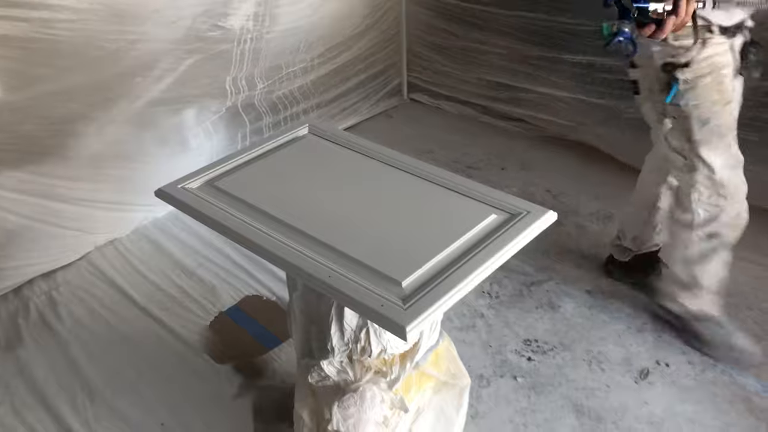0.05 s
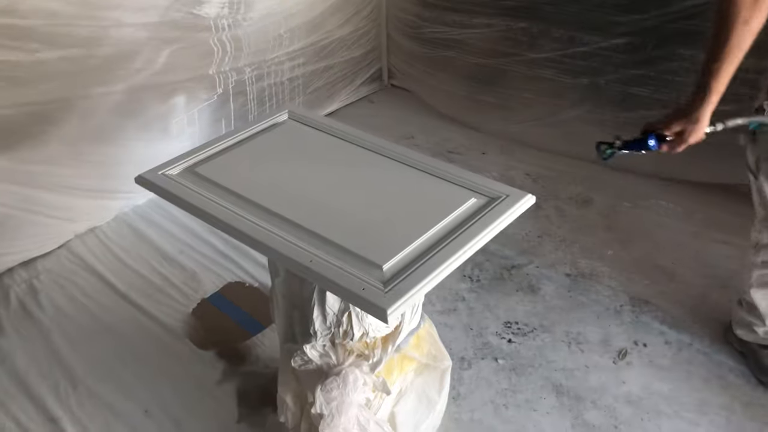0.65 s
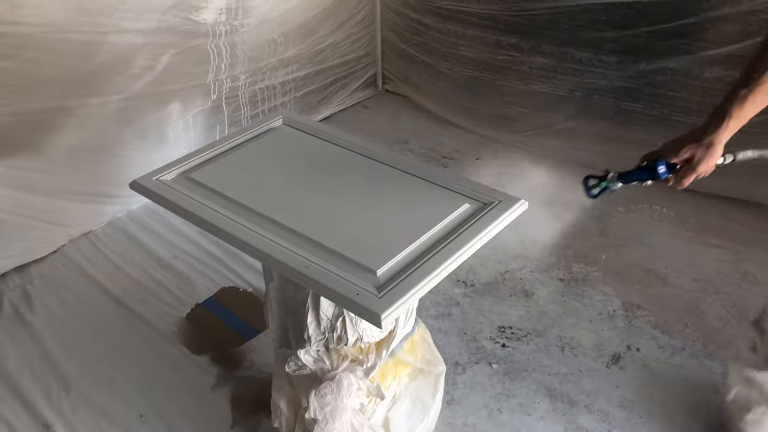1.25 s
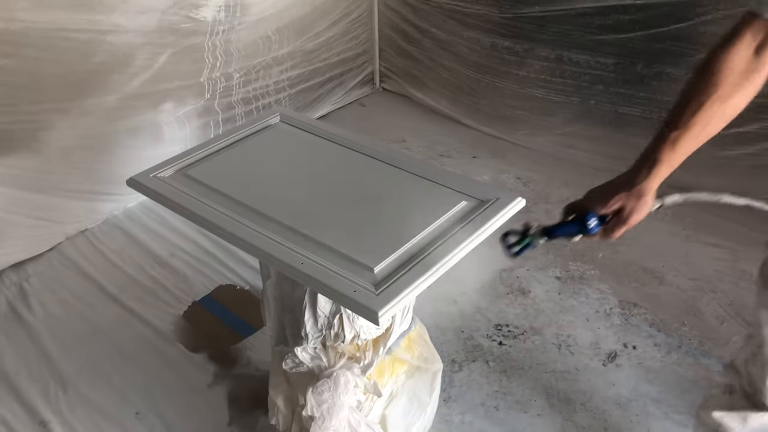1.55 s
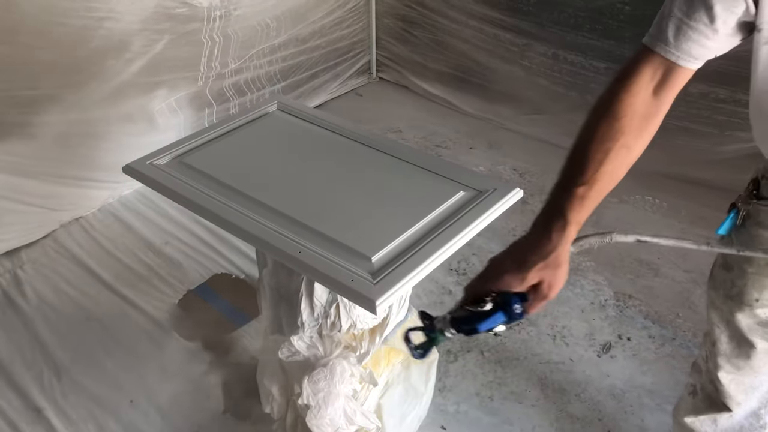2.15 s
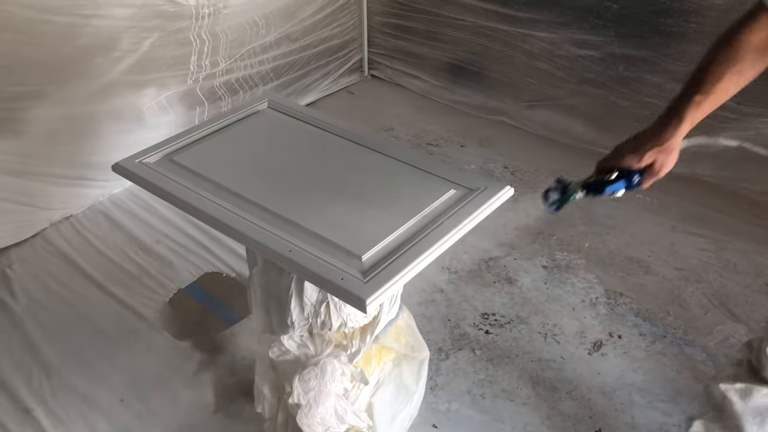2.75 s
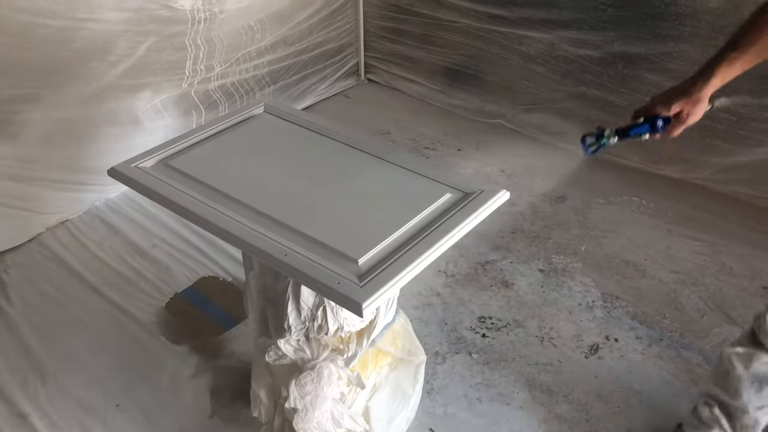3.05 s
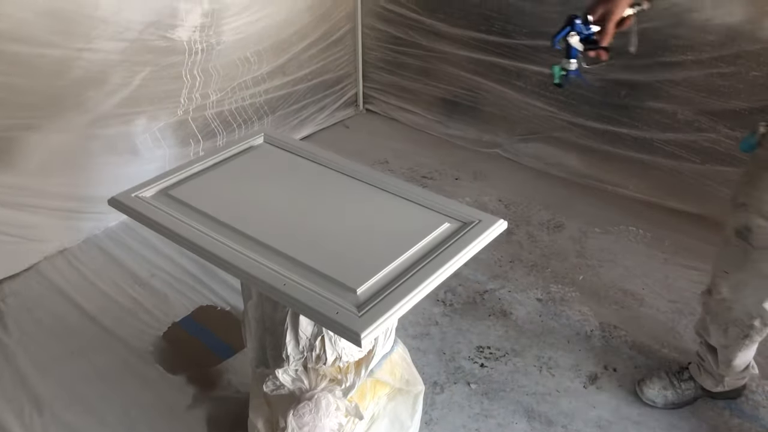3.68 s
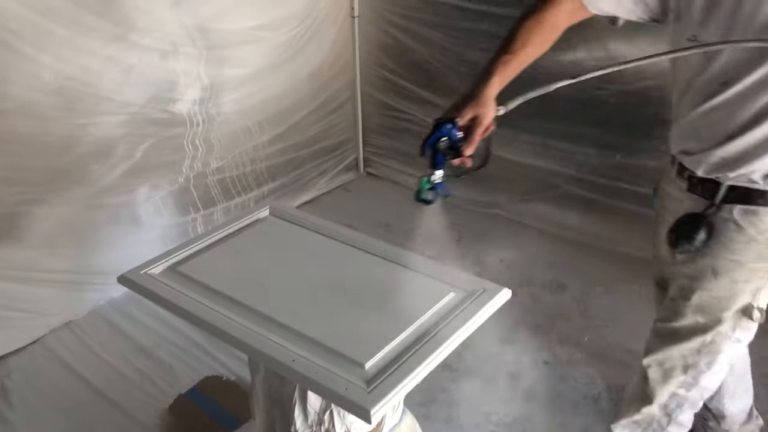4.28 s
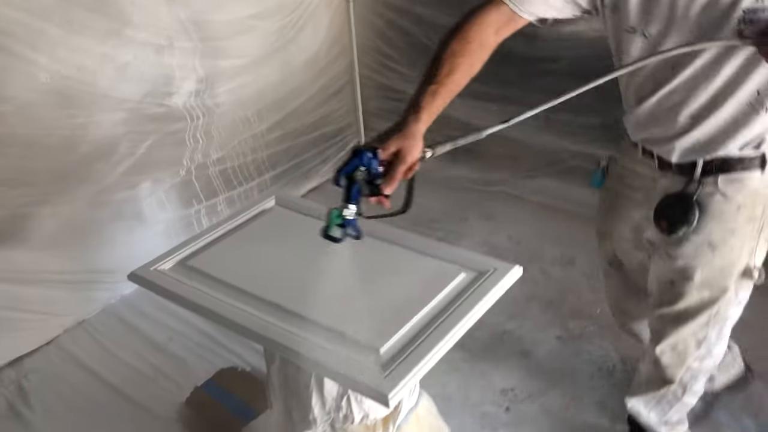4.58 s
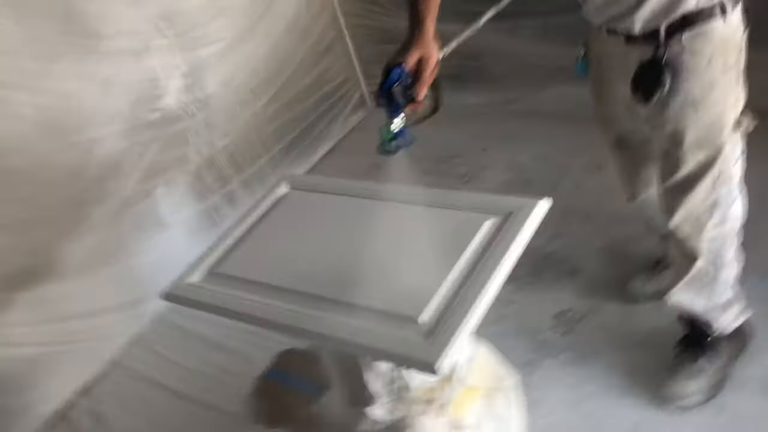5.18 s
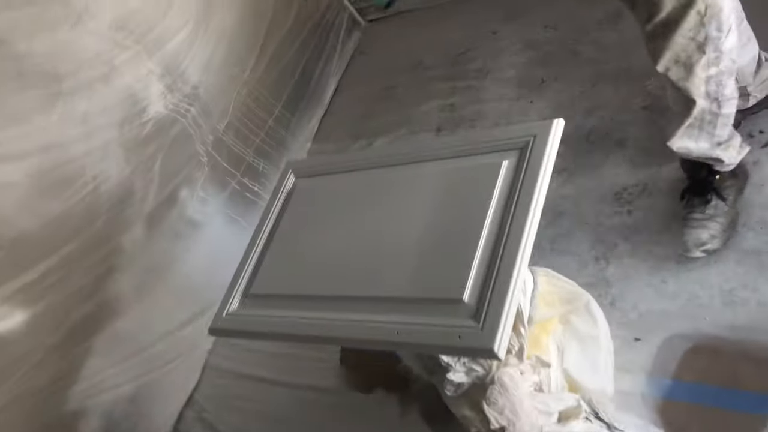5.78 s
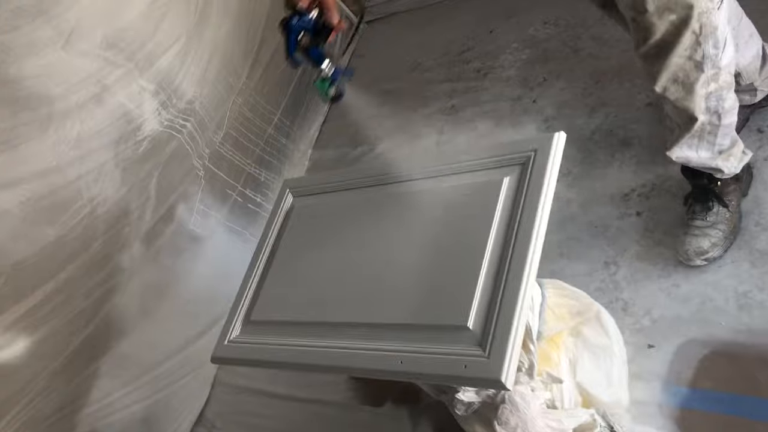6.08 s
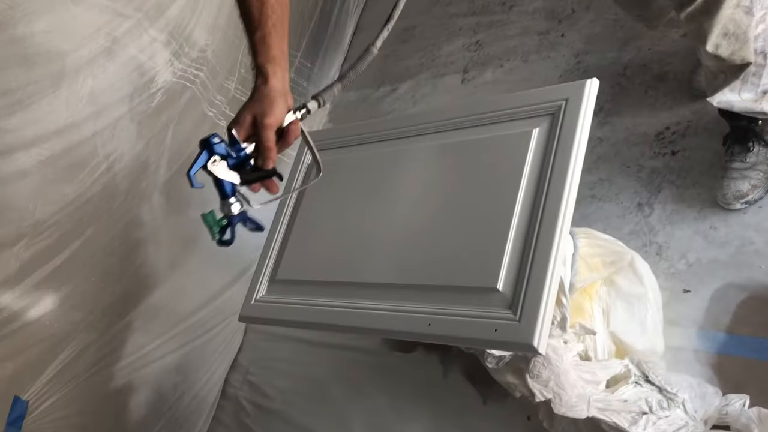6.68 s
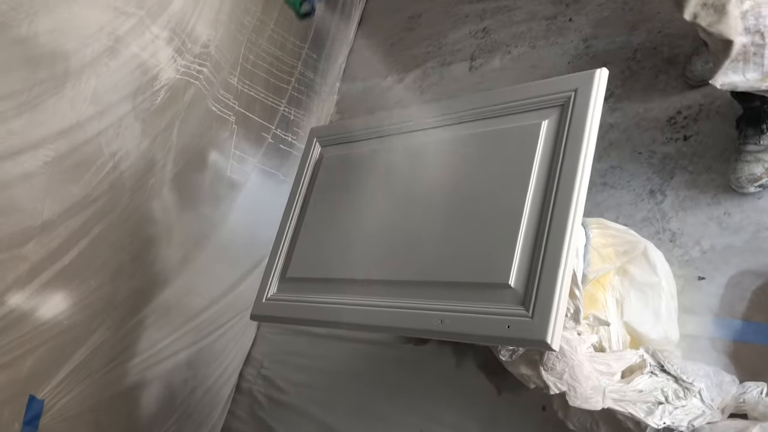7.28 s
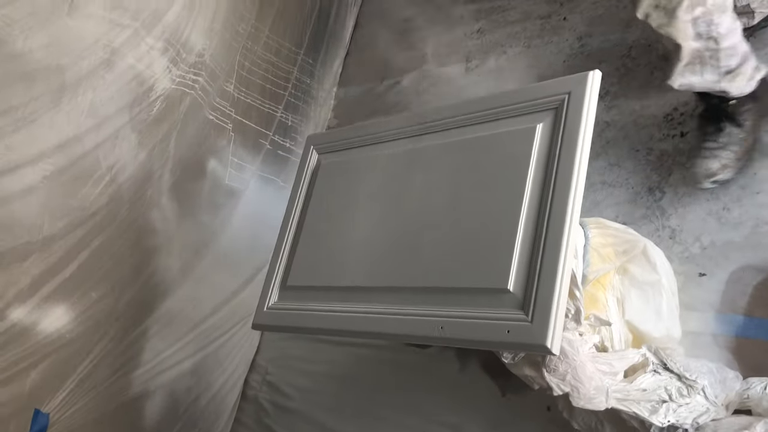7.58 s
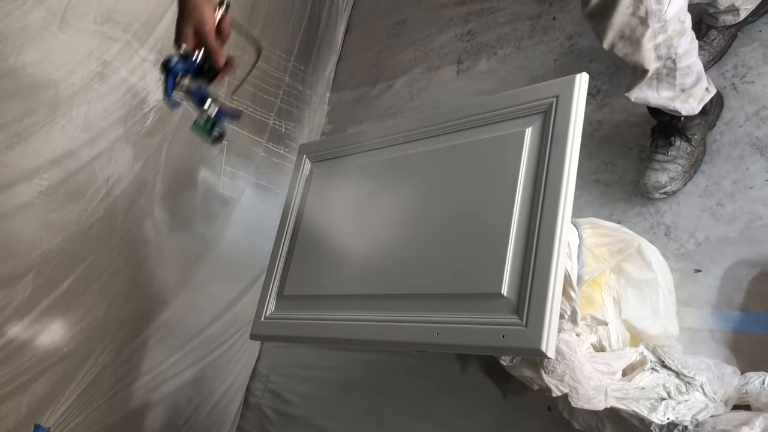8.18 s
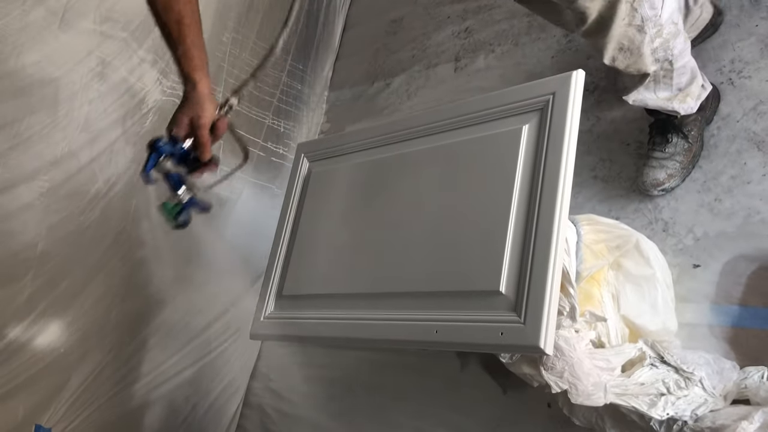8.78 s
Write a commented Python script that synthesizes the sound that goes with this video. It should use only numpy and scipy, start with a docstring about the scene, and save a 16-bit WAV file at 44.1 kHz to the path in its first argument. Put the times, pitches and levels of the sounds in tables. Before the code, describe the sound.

A ventilation fan rumbles faintly throughout in a small plastic-lined booth. During the first second and a half, overalls rustle softly and shoes scuff on a gritty floor. At about 1.1 seconds a paint spray gun snaps on with a bright, airy hiss, the loudest sound, lasting until 2. More passes follow at roughly 2.4 to 3.2, 4 to 4.8, 5 to 5.7, 5.9 to 6.7, 6.9 to 7.6 and 7.9 to 8.6, with a last short burst at 8.8. Each starts sharply and cuts off quickly; the hiss flares and changes colour, swishing more in the second half. From about 1.7 seconds a quieter electric pump, farther off, repeatedly whirrs up and runs down in short spurts, with a geared hum, a light rattle and a thin high whine. Another faint scuff comes near 4.2. The sound is close, with short reflections.

```python
"""Spray-painting a cabinet door

A painter steps up in a plastic-lined booth and sprays in passes with an airless gun. Paint tearing
into mist hisses brightly, changing colour as the gun turns. An electric pump whirrs up and runs down
in short bursts to restore the hose pressure; a ventilation fan rumbles throughout."""
import sys
import numpy as np
from scipy import signal
from scipy.fft import rfft, irfft
from scipy.io import wavfile
from scipy.ndimage import uniform_filter1d, map_coordinates

SR = 44100
rng = np.random.default_rng(int(sys.argv[2]) if len(sys.argv) > 2 else 0)


def put_to_file(sound):
    """Save the sound as 16-bit audio at rate SR, in the file named by the first command-line argument."""
    columns = np.atleast_2d(sound).T  # one column per channel
    safe = np.clip(columns, -1, 1)
    whole_steps = np.round(safe * 32767)
    wavfile.write(sys.argv[1], SR, whole_steps.astype(np.int16))


N = 389844
TIME = np.arange(N) / SR
FREQS = np.maximum(np.fft.rfftfreq(N, 1 / SR), 1)


def spray_gun(flutter_db, patchy_db, glance_db, swish_db):
    """Paint tears into hissing mist at the nozzle; the hiss flares as the fan of paint swings by."""
    # tone colour of the nozzle: (frequency [Hz], relative level [dB])
    jet_colour = [(400, -35.5), (1000, -28.5), (2200, -22.5), (2900, -20), (3600, -13.5), (4300, -12.5),
                  (5000, -9), (5900, -10), (7200, -4.5), (9000, -4), (12000, -1.4), (15500, -0.5)]
    # passes of the gun: (valve opens [s], valve shuts [s], base level [dB], treble tilt [dB per octave],
    # delay of the glancing echo at the start [ms], at the end [ms])
    passes = [(1.115, 1.991, -21, -0.5, 0.64, 0.58), (2.3668, 3.204, -20.5, -0.8, 0.72, 0.64),
              (3.9627, 4.800, -20.7, -0.5, 0.73, 0.77), (5, 5.713, -20.5, -0.4, 0.88, 0.96),
              (5.9348, 6.7, -20, -0.95, 0.99, 1.37), (6.895, 7.644, -19.5, -0.5, 1.22, 1.016),
              (7.8823, 8.622, -20, -1, 0.9, 1.47), (8.8190, 8.95, -19.5, 0.5, 1.3, 1.86)]
    # flares of the hiss: (time [s], boost [dB], centre [Hz], half-width [s])
    flares = [(1.38, 4, 15000, 0.27), (1.87, 2.5, 10000, .08), (2.432, 3.5, 14000, 0.054),
              (4.2, 5, 14000, 0.18), (6.056, 4.5, 14000, .025), (6.167, 1.5, 9500, 0.052),
              (6.654, 3, 15140, 0.051), (7.051, 5.5, 12500, .045), (7.221, 3.5, 12000, 0.033),
              (7.34, 4, 12000, 0.024), (7.526, 4, 7400, 0.027), (8.063, 7.5, 13530, 0.038),
              (8.217, 6, 15000, 0.043), (8.363, 4, 10560, 0.043)]
    pivot_hz, flare_octaves = 9000, .45   # the tilt turns about this pitch; spread of a flare
    flow = sum(from_db(db) * valve(on, off) for on, off, db, *_ in passes)
    tilt_db, lag_ms = in_time([row for on, off, _, tilt, first, last in passes
                               for row in ((on, tilt, first), (off, tilt, last))])
    boosts = [(hz, db * swell(s, 0, length)) for s, db, hz, length in flares]
    # split the hiss into six bands, each with its own changing level
    centres = np.geomspace(3800, 14500, 6)
    band_of = np.digitize(FREQS, np.sqrt(centres[1:] * centres[:-1]))
    jet, hiss = rfft(coloured(jet_colour)), 0
    for k, centre in enumerate(centres):
        flare_db = sum(db * np.exp(-(np.log2(centre / hz) / flare_octaves) ** 2) for hz, db in boosts)
        band_db = tilt_db * np.log2(centre / pivot_hz) + flare_db + patchy_db * drift(14)
        hiss = hiss + irfft(jet * (band_of == k), N) * from_db(band_db)
    hiss = hiss * flow * from_db(flutter_db * drift(150))
    # close, shifting echoes make the hiss swish, more so once the listener has moved round
    glance = from_db(glance_db) * delayed(hiss, lag_ms)
    swish = from_db(swish_db) * sum(delayed(hiss, ms * (1 + .2 * drift(1.2))) for ms in (.4, 1.8, 3.0))
    nearness = np.interp(TIME, [4, 7], [.55, 1])
    return moving_in_booth(hiss + nearness * (glance + swish), wet_db=-8, decay_s=.29)


def valve(on, off, open_s=.0019, shut_s=.015, spit=.055, spit_s=.0015):
    """The needle snaps open with a spit of stored pressure; on release the flow dies more slowly."""
    age = np.maximum(TIME - on, 0)
    opening = (1 - np.exp(-age / open_s)) * (1 + spit * np.exp(-age / spit_s))
    return opening * np.exp(-np.maximum(TIME - off, 0) / shut_s)


def pump(casing_db, gear_db, air_db, rattle_db):
    """Gears hum and shake the casing; the cooling air and the drive's whine grow with speed."""
    # tone colour of the casing: (frequency [Hz], relative level [dB])
    casing_colour = [(150, -43), (260, -1.5), (360, -13.5), (470, -10), (600, -7.5), (730, 0), (1000, 3.5),
                     (1300, 2.5), (1600, -9), (1900, -17), (2600, -19), (4000, -19), (9000, -29),
                     (16000, -70)]
    # ringing panels: (pitch [Hz], width [Hz], relative level [dB])
    panels = [(359, 27, -18), (731, 14.7, -14.5), (939, 3.9, -13.5), (1226, 8.3, -22.5), (1311.6, 46, -13),
              (1605, 15.6, -18.5)]
    # the pump booms less once the listener has moved round: (time [s], bass boost [dB])
    bass_curve = [(4.5, 2.5), (5.5, -2)]
    # air rushing through the motor: (frequency [Hz], relative level [dB])
    air_colour = [(900, 1), (1900, 8), (3000, 0.5), (3600, -2.5), (5000, -4), (8500, -4.5), (11000, -11),
                  (16000, -23)]
    # whine of the motor drive: (pitch [Hz], width [Hz], relative level [dB])
    drive_tones = [(6680, 25, -24), (6830, 100, -22.5), (9560, 200, -28)]
    # the drive sings out briefly under load: (time [s], level [dB], pitch [Hz], half-width [s])
    sings = [(2.079, -56, 6960, 0.046), (3.45, -54, 6560, 0.058), (4.931, -50, 6862, 0.05),
             (7.739, -39.5, 6930, 0.033), (8.789, -44.5, 6860, .04)]
    mesh_hz, level_db = motor()
    speed = mesh_hz / mesh_hz.max()
    phase = 2 * np.pi * np.cumsum(mesh_hz * (1 + .052 * drift(90))) / SR
    # the teeth press hardest while back pressure brakes the motor, less as it speeds up
    acceleration = uniform_filter1d(np.gradient(speed) * SR, size=2000)
    load = np.interp(acceleration, [0, 2], [1, .35])
    # the casing gives off only its middle range, so the octave takes over as the motor slows
    middle = signal.butter(5, [925, 1640], "band", fs=SR, output="sos")
    gears = signal.sosfilt(middle, np.sin(phase) + .33 * np.sin(2 * phase))
    # each panel rings up as the tone glides through it
    gears = gears + sum(resonance(gears, hz, width) for hz, width, _ in panels)
    gears = booth(gears * load * from_db(2.8 * drift(66)), wet_db=-5, decay_s=.28)
    # the pump stands well off, so reflections colour its rattle
    casing = from_db(casing_db) * booth(coloured(casing_colour), wet_db=-13, decay_s=.14)
    casing = casing + ringing(panels)
    bass_db, = in_time(bass_curve)
    bass = irfft(rfft(casing) * (FREQS < 560), N)
    casing = casing + (from_db(bass_db) - 1) * bass
    casing = casing * from_db(rattle_db * drift(79)) * load ** .22
    air = from_db(air_db) * speed ** 2 * coloured(air_colour)
    whine = speed ** .82 * ringing(drive_tones)
    singing = sum(swell(s, db, length) * ringing([(hz, 25, 0)]) for s, db, hz, length in sings)
    return from_db(level_db) * (casing + from_db(gear_db) * gears + air + whine) + singing


def motor():
    """The motor spins up, coasts and stops; gives the mesh rate (teeth meeting, Hz) and level (dB)."""
    # pump runs: (starts [s], eases off [s], brakes [s], mesh rate before easing [Hz], base level [dB])
    runs = [(1.74, 1.905, 2.16, 944, -33.5), (2.631, 2.745, 2.99, 972, -34),
            (3.10, 3.32, 3.73, 1650, -32.5), (4.719, 4.81, 5.12, 1030, -32.5),
            (5.383, 5.48, 5.69, 950, -32.5), (5.757, 5.81, 5.86, 935, -31.5), (6.30, 6.55, 7.02, 1673, -34),
            (7.516, 7.675, 8.01, 1584, -34), (8.575, 8.72, 9.14, 1600, -33.5)]
    free_hz, crawl_hz = 1800, 640.5   # mesh rate running free, and making up the last pressure
    spin_up_s, coast_s, brake_s = .064, .52, .4
    knee_hz, steepness, db_per_octave = 647, 3.65, 1.5   # quiet below the knee, slowly louder above
    mesh_hz, run_db = np.ones(N), np.zeros(N)
    for start, ease, stop, top_hz, db in runs:
        rising = free_hz * (1 - np.exp(-np.maximum(TIME - start, 0) / spin_up_s))
        coasting = np.maximum(top_hz * np.exp(-np.maximum(TIME - ease, 0) / coast_s), crawl_hz)
        run_hz = np.minimum(rising, coasting) * np.exp(-np.maximum(TIME - stop, 0) / brake_s)
        run_db = np.where(run_hz > mesh_hz, db, run_db)
        mesh_hz = np.maximum(mesh_hz, run_hz)
    ratio = mesh_hz / knee_hz
    quieting_db = 10 * np.log10(1 + ratio ** (-2 * steepness))
    return mesh_hz, run_db + db_per_octave * np.log2(ratio) - quieting_db


def painter(cloth_db, sway_db, crinkle_db, walk_ends_s=1.24, settle_s=.33):
    """Overalls rustle while the painter walks up; soles scuff on the gritty floor."""
    # tone colour of the overalls: (frequency [Hz], relative level [dB])
    cloth_colour = [(900, 1), (2000, -2), (3500, 3.5), (5500, 2), (8000, -0.5), (12000, -3.5),
                    (16000, -2.5)]
    # shoe scuffs: (time [s], level [dB], centre [Hz], half-width [s])
    scuffs = [(0.901, -44.5, 4070, .009), (0.922, -41.5, 3200, 0.02), (0.915, -50, 1700, .012),
              (1.04, -46.5, 8000, .06), (1.47, -37.5, 3900, 0.013), (4.19, -39, 3800, .018),
              (4.2, -47.5, 1250, 0.053)]
    walking = np.clip(1 - (TIME - walk_ends_s) / settle_s, 0, 1)
    rustle_db = cloth_db + sway_db * drift(10) + crinkle_db * drift(150)
    out = walking * from_db(rustle_db) * coloured(cloth_colour)
    grit = rng.standard_normal(N) * from_db(2.7 * drift(210))
    for s, db, hz, length in scuffs:
        rub = resonance(resonance(grit, hz, .49 * hz), hz, .49 * hz)
        out = out + swell(s, db, length) * rms_one(rub)
    return out


def ventilation(fan_db, wander_db):
    """A steady fan with a little mains hum, and a rumble that slowly swells and sinks."""
    # tone colour of the fan: (frequency [Hz], relative level [dB])
    fan_colour = [(22, -42), (40, -45), (55, -1), (74, 4.5), (95, -11), (125, -2), (200, -4), (300, -7.5),
                  (420, -8.5), (580, -16), (780, -10), (1400, -16), (3000, -24.5), (16000, -34)]
    # mains hum: (pitch [Hz], level [dB])
    hum_tones = [(59.2, -67), (118.6, -61.5)]
    # slow rise and fall of the rumble: (time [s], base level [dB])
    rumble_curve = [(0, -57), (4.8, -53.5), (7.1, -50.5), (8.8, -58)]
    hum = sum(from_db(db) * np.sqrt(2) * np.sin(2 * np.pi * hz * TIME + .44 * drift(2))
              for hz, db in hum_tones)
    level_db, = in_time(rumble_curve)
    level = from_db(level_db + wander_db * drift(1.8)) + swell(s=1.555, db=-43, half_width_s=.13)
    rumble = level * coloured([(80, -39), (120, -2), (210, 1.5), (290, -12.5), (600, -20)])
    return from_db(fan_db) * coloured(fan_colour) + rumble + hum


def booth(x, wet_db, decay_s):
    """Direct sound plus a short wash of echoes off the plastic sheeting, falling 60 dB in decay_s."""
    t = TIME[:SR // 2]
    tail = rng.standard_normal(len(t)) * from_db(-60 * t / decay_s) * (t > .003)
    echoes = signal.fftconvolve(x, tail / np.linalg.norm(tail))[:len(x)]
    wet = from_db(wet_db)
    return (x + wet * echoes) / np.sqrt(1 + wet ** 2)


def moving_in_booth(x, wet_db, decay_s):
    """A moving source meets a new pattern of reflections every tenth of a second."""
    hop, ring_out = SR // 10, SR // 3
    echoes, x = np.zeros(N + 2 * hop + ring_out), np.pad(x, (0, 2 * hop))
    fade = np.sin(np.pi * np.arange(2 * hop) / (2 * hop))
    for i in range(0, N, hop):
        piece = np.pad(x[i:i + 2 * hop] * fade, (0, ring_out))
        echoes[i:i + len(piece)] += np.sqrt(2) * booth(piece, 0, decay_s) - piece   # reflections alone
    wet = from_db(wet_db)
    return (x[:N] + wet * echoes[:N]) / np.sqrt(1 + wet ** 2)


def from_db(db):
    """Turn decibels into a multiplier."""
    return 10 ** (np.asarray(db) / 20)


def rms_one(x):
    """Scale to an average power of 1."""
    return x / np.sqrt(np.mean(x ** 2) + 1e-20)


def in_time(rows):
    """Join (time, values...) rows with straight lines: one curve for each value column."""
    s, *columns = np.transpose(rows)
    return [np.interp(TIME, s, c) for c in columns]


def coloured(spectrum):
    """Noise of power 1, shaped by (frequency [Hz], relative level [dB]) rows."""
    hz, db = np.transpose(spectrum)
    gain = from_db(np.interp(np.log(FREQS), np.log(hz), db))
    return rms_one(irfft(rfft(rng.standard_normal(N)) * gain, N))


def drift(rate):
    """Random wander of typical size 1, up to about rate turns a second."""
    count = 16384
    hz = np.fft.rfftfreq(count, TIME[-1] / count)
    slow = rms_one(irfft(rfft(rng.standard_normal(count)) / (1 + (hz / rate) ** 2)))
    return np.interp(TIME, np.linspace(0, TIME[-1], count), slow)


def resonance(x, hz, width_hz):
    """Let through the sound near one pitch, as a ringing object does."""
    r = np.exp(-np.pi * width_hz / SR)
    feedback = [1, -2 * r * np.cos(2 * np.pi * hz / SR), r * r]
    return signal.lfilter(np.array([1, 0, -1]) * (1 - r * r) / 2, feedback, x)


def ringing(modes):
    """Narrow resonances kept ringing by random shaking."""
    shake = rng.standard_normal(N)
    return sum(from_db(db) * rms_one(resonance(shake, hz, width)) for hz, width, db in modes)


def swell(s, db, half_width_s):
    """A bell-shaped rise and fall that peaks at time s."""
    return from_db(db) * np.exp(-((TIME - s) / half_width_s) ** 2 / 2)


def delayed(x, lag_ms):
    """A late copy of a sound; the delay may change over time."""
    return map_coordinates(x, [np.arange(N) - lag_ms * SR / 1000], order=3)


def scene():
    """Gun, pump, painter and fan, heard from one spot, alike in both channels."""
    hiss = spray_gun(flutter_db=.7, patchy_db=.6, glance_db=-14, swish_db=-17)
    whirr = pump(casing_db=-5, gear_db=.3, air_db=-5, rattle_db=1.6)
    fan = ventilation(fan_db=-47.5, wander_db=1.5)
    movement = painter(cloth_db=-47.5, sway_db=1, crinkle_db=.6)
    mono = hiss + whirr + movement + fan
    return np.array([mono, mono])


def record(dry):
    """Cut off the very highest treble steeply."""
    cutoff_hz = 15850
    return signal.sosfilt(signal.ellip(12, .1, 80, cutoff_hz, fs=SR, output="sos"), dry)


dry = scene()
out = record(dry)
put_to_file(out)
```